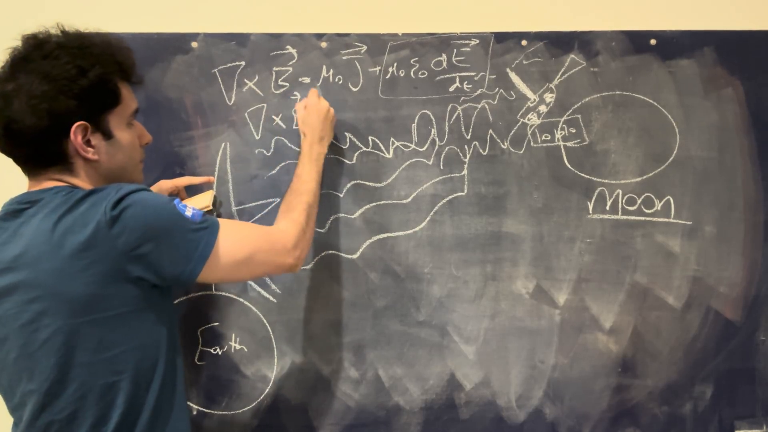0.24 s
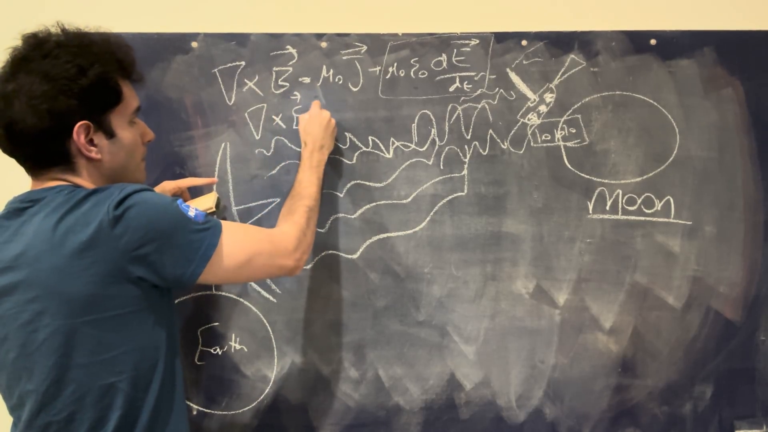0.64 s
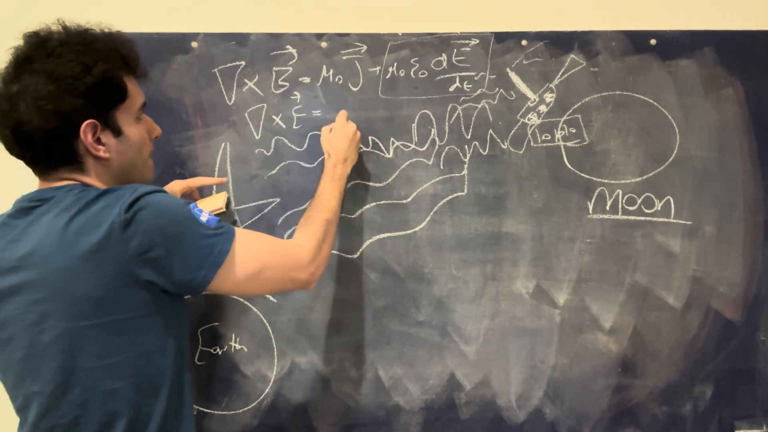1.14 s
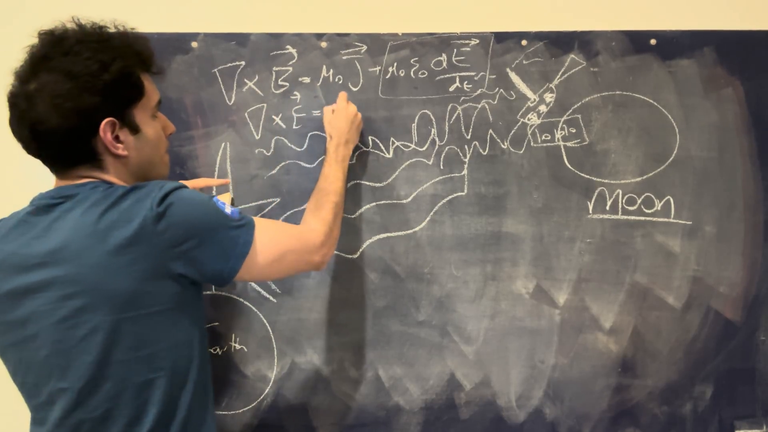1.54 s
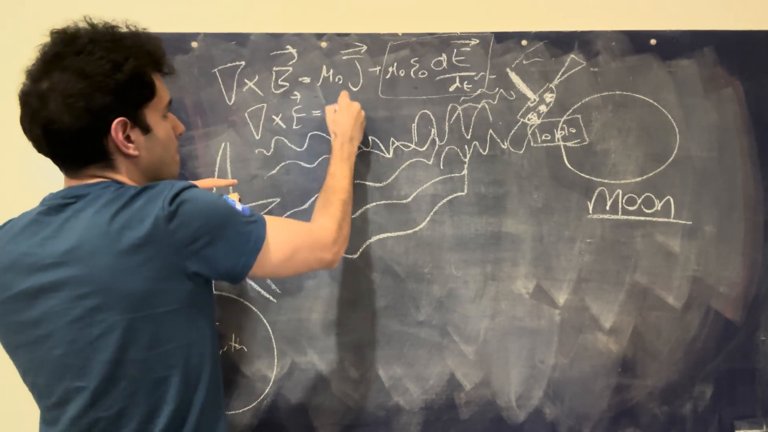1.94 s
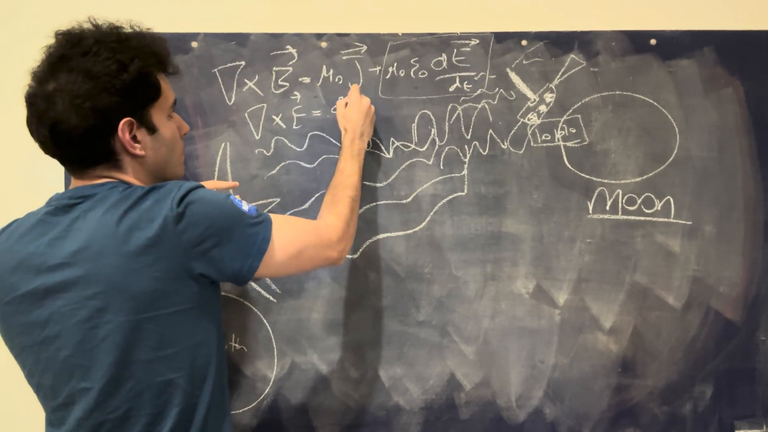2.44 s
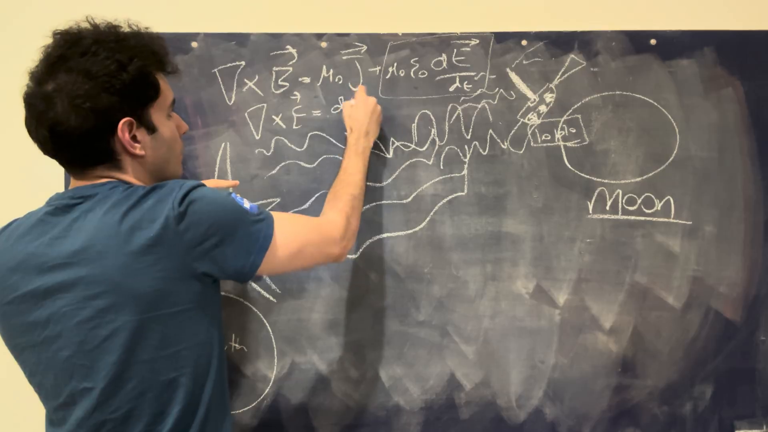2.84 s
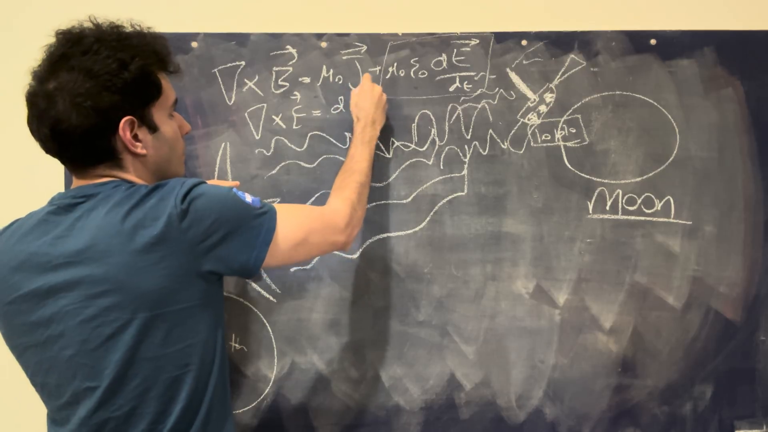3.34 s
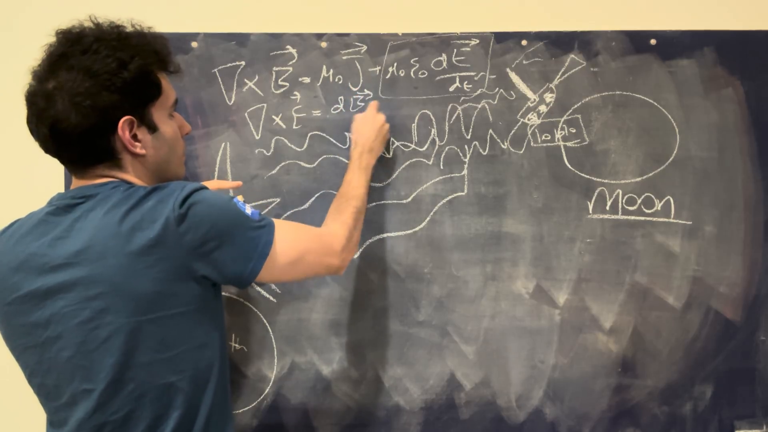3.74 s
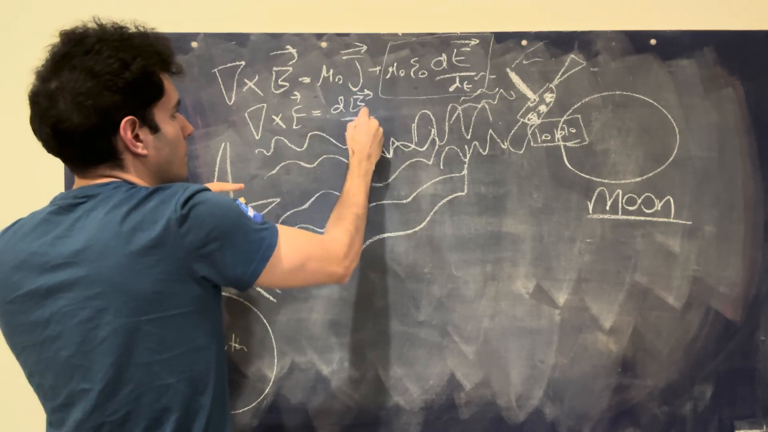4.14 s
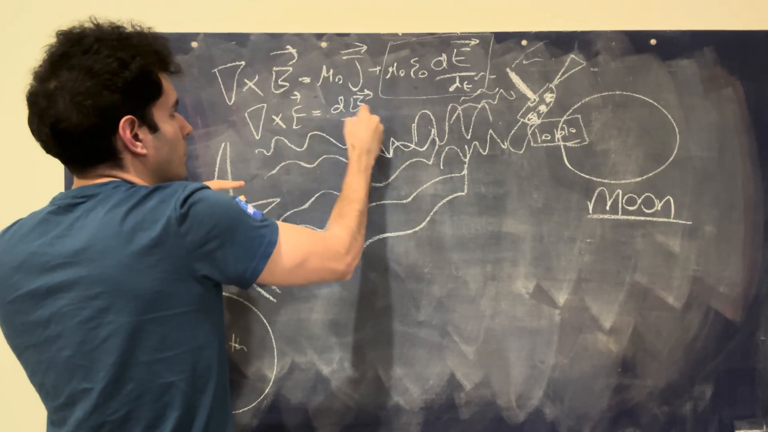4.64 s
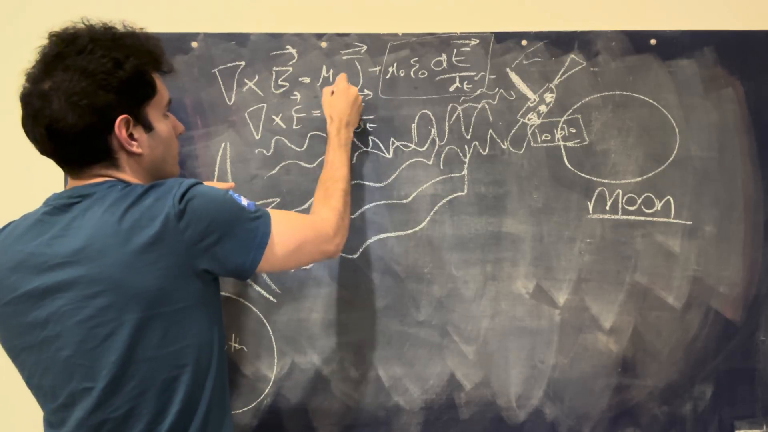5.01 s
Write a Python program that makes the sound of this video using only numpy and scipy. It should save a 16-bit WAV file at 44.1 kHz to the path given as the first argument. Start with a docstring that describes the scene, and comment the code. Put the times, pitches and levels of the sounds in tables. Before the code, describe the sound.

Short chalk strokes heard by a single microphone in a hard-walled room: each landing gives a crisp tick and a hollow, woody knock from the panel, usually followed by a quick, dry, gritty scrape. The rhythm is irregular, with gaps holding only faint dry clicks. Writing grows busier in the second half and stops shortly before the end, leaving soft duct rumble, air rush and hum.

```python
"""Chalk writes a few symbols on a wall blackboard in a quiet room, heard by one microphone.
Ventilation rushes, rumbles and hums throughout: coloured noise and wavering sines. A stroke is already
under way: the tip crumbles in tiny slips that hiss and shake the panel. Faint dry clicks fall in the pauses.
From 0.45 s taps and catches tick in the chalk and knock the panel, among more strokes until 4.7 s.
Bending waves return from the frame, something close reflects dully, the walls answer, the air is left."""
import sys
import numpy as np
from scipy import signal
from scipy.fft import rfft, irfft
from scipy.io import wavfile

SR = 44100
rng = np.random.default_rng(int(sys.argv[2]) if len(sys.argv) > 2 else 0)


def log_audio(samples):
    """Write samples as a 16-bit WAV file to the path given in sys.argv[1]."""
    # one column per channel
    frames = np.atleast_2d(samples).T
    # limit to full scale, then quantise
    limited = np.clip(frames, -1, 1)
    pcm = np.round(limited * 32767).astype(np.int16)
    wavfile.write(sys.argv[1], SR, pcm)


N = 232362
TIME = np.arange(N) / SR
FREQ = np.maximum(np.arange(N // 2 + 1) * SR / N, 1e-3)

# ring of the struck chalk tip: [f/Hz, relative level/dB]
TICK_RING = [(1000, -23), (4000, -8.5), (6500, -3), (9200, 6), (12800, 5.5), (16000, -10)]


def undb(db):
    """Decibels to gain."""
    return 10 ** (np.asarray(db) / 20)


def unit(x):
    """Scale to rms 1."""
    return x / np.sqrt(np.mean(x ** 2))


def spectrum(points, hz):
    """Join (Hz, value) points on a log-frequency axis."""
    f, value = np.transpose(points)
    return np.interp(np.log(np.maximum(hz, 1)), np.log(f), value)


def colour(x, points):
    """Give a steady signal a spectrum, at rms 1."""
    return unit(irfft(rfft(x) * undb(spectrum(points, FREQ)), N))


def walk(rate):
    """Random wandering about 0: straight lines between normal draws, `rate` draws per second."""
    knots = rng.standard_normal(8192)
    return np.interp(TIME * rate, np.arange(len(knots)), knots)


def ventilation(duct_db=-45, waver_db=2, drift_rad=0.45):
    """Broad air noise, low duct noise, sines wavering in level and phase, and air swaying below hearing."""
    # rush of air: [f/Hz, relative level/dB per Hz]
    rush_spectrum = [(62, -2), (142, 1), (212, 0.5), (305, -4.5), (510, -9.5), (760, -6), (960, -12),
                     (1260, -15), (1720, -20.5), (2650, -27.5), (5000, -32), (6600, -32), (8400, -35.5),
                     (15500, -38.5)]
    # duct rumble: [f/Hz, relative level/dB per Hz]
    duct_spectrum = [(15, -3), (30, 2), (42, 8.5), (53, 3), (62, -4), (72, -11.5), (84, -8), (105, -22.5),
                     (200, -80), (800, -100)]
    # hum, at the middle of its waver: [f/Hz, level/dB]
    hum_tones = [(119.5, -59.5), (179, -84), (210.5, -72.5), (371.4, -75)]
    # slow swaying of the air: [f/Hz, relative level/dB per Hz]
    sway_spectrum = [(2, 25), (7, 26), (11, 24.5), (16, -6), (24, -23), (45, -60), (200, -120)]
    rush_db, sway_db = -61, -29.5

    rush = undb(rush_db) * colour(rng.standard_normal(N), rush_spectrum)
    rumble = undb(duct_db) * colour(rng.standard_normal(N), duct_spectrum)
    hum = np.zeros(N)
    for hz, db in hum_tones:
        level = np.sqrt(2) * undb(db + waver_db * walk(4.1))
        hum += level * np.sin(2 * np.pi * hz * TIME + drift_rad * walk(8.5))
    sway = undb(sway_db) * colour(rng.standard_normal(N), sway_spectrum)
    return rush + rumble + hum + sway


def blow(points, size=4096):
    """The minimum-phase ring, prompt and causal, that has this spectrum, with energy 1."""
    cepstrum = irfft(np.log(undb(spectrum(points, np.arange(size // 2 + 1) * SR / size))))
    # fold the cepstrum forward in time
    cepstrum[1:size // 2] *= 2
    cepstrum[size // 2 + 1:] = 0
    ring = irfft(np.exp(rfft(cepstrum)))
    return ring / np.sqrt(np.sum(ring ** 2))


def scatter(sound, db, t60, above_hz):
    """Add a short burst of dense upper modes, drawn anew at every spot."""
    t = TIME[:len(sound)]
    burst = rng.standard_normal(len(t)) * undb(-60 * t / t60)
    burst = burst / np.sqrt(np.sum(burst ** 2))
    high_pass = signal.butter(3, above_hz, "high", fs=SR, output="sos")
    burst = signal.sosfilt(high_pass, burst)
    return sound + undb(db) * signal.fftconvolve(sound, burst)[:len(t)]


def panel(depth_db, clack_db):
    """The panel's ring, deeper or harder with the place and angle of the chalk."""
    # answer to a sharp push: [f/Hz, relative level/dB]
    push_answer = [(100, -19.5), (250, -16.5), (420, -14), (530, -3.5), (740, 4.5), (880, -6.5),
                   (1100, -11.5), (1400, -15.5), (1650, -18.5), (2100, -24.5), (3200, -35), (4000, -43.5),
                   (6500, -42.5), (16000, -110)]
    # how this touch tilts that answer: (Hz, dB)
    touch = [(530, depth_db), (740, 0), (1000, clack_db / 4), (1350, clack_db + 0.5),
             (1650, clack_db + 1.5), (2100, clack_db / 2 - 1.0), (3500, clack_db / 4)]
    return blow([(hz, db + spectrum(touch, hz)) for hz, db in push_answer])


def add(out, s, sound):
    """Mix a sound in at time s, or at the start if s is negative."""
    i = max(int(s * SR), 0)
    out[i:i + len(sound)] += sound[:N - i]


def slips(rate, spread_db):
    """Tiny fractures of the tip at random moments: many small, a few large."""
    happens = rng.random(N) < rate / SR
    sizes = undb(spread_db * np.minimum(rng.exponential(size=N), 5))
    return unit(happens * sizes * rng.standard_normal(N))


def strokes(judder_db=2.0, judder_rate=200, uneven_db=1.56, uneven_rate=45, rasp_db=-14):
    """The tip speeds up, slows and snags; its slips hiss in the chalk and shake the panel."""
    # slides, overlapping where one line turns:
    # [start t/s, length/s, pressure as panel drive level/dB, brightness of the spot/dB]
    slides = [(-.13, 0.28, -45, 2), (0.461, 0.074, -47, 3.5), (0.661, 0.061, -43, 6.5),
              (1.633, .1, -49.5, 14), (1.721, 0.18, -51, 0), (1.908, 0.14, -48, 3), (2.653, 0.093, -46, 4),
              (2.748, 0.11, -45.5, -6), (2.86, 0.061, -52.5, 2), (2.916, 0.085, -55.5, 0),
              (3.021, 0.079, -52, 11), (3.227, 0.094, -58, 3), (3.408, 0.095, -52, 7),
              (3.5, 0.065, -54, -2), (3.774, 0.13, -40.5, 12.5), (4.015, 0.084, -58, -5),
              (4.097, 0.13, -47.5, -10), (4.227, 0.11, -60, 13), (4.415, 0.14, -55.5, -5),
              (4.603, 0.084, -50, 6)]
    # ring of the rubbed chalk tip: [f/Hz, relative level/dB]
    hiss_ring = [(1000, -39), (3000, -7.5), (6300, -11), (8000, -6.5), (9500, -1.5), (12200, 2.5),
                 (14000, -3), (16000, -4)]
    # speed as a gain: fastest at this share of the length, quieter at both ends
    fastest_share, start_db, end_db, edge_s = 0.49, -9, -6, 0.01
    # hiss drive at ordinary pressure, and its growth in dB per dB of pressure
    ordinary_hiss_db, ordinary_db, hiss_per_pressure = -60, -46.5, 0.28
    # a bright spot loses depth and gains this much clack per dB
    clack_per_brightness = 0.57
    # the tip snags just before it lifts: tick over the hiss drive, and its spread between strokes
    snag_lead_s, snag_db, snag_spread_db = 0.012, 10, 0.5

    out = np.zeros(N)
    roughness_db = judder_db * walk(judder_rate) + uneven_db * walk(uneven_rate)
    grit = unit(slips(rate=14000, spread_db=2.0) * undb(roughness_db))
    for s, length_s, pressure_db, bright_db in slides:
        during = (TIME >= s) & (TIME < s + length_s)
        t = TIME[during] - s
        contact = np.clip(np.minimum(t, length_s - t) / edge_s, 0, 1)
        speed = undb(np.interp(t / length_s, [0, fastest_share, 1], [start_db, 0, end_db]))
        force = grit[during] * contact * speed

        hiss_db = ordinary_hiss_db + hiss_per_pressure * (pressure_db - ordinary_db)
        tip = scatter(blow(hiss_ring), db=-8, t60=0.015, above_hz=4000)
        add(out, s, undb(hiss_db) * signal.fftconvolve(force, tip))

        # the panel's rumble grows faster with speed than the hiss does
        spot = panel(-bright_db, clack_per_brightness * bright_db)
        shake = scatter(spot, db=rasp_db, t60=0.0083, above_hz=6600)
        add(out, s, undb(pressure_db) * signal.fftconvolve(force * speed, shake))

        tick_db = hiss_db + snag_db + snag_spread_db * rng.standard_normal()
        add(out, s + length_s - snag_lead_s, undb(tick_db) * blow(TICK_RING))
    return out


def clicks():
    """Faint dry clicks between strokes: a short ring with a burst of upper modes."""
    # clicks in the pauses: [t/s, level before the burst is added/dB]
    pause_clicks = [(0.3989, -34), (1.2984, -38), (1.377, -43), (2.399, -47), (2.453, -45), (2.4814, -42)]
    # their ring: [f/Hz, relative level/dB]
    click_ring = [(200, -22), (750, 19), (1500, 2), (3400, -3), (5500, -20), (15000, -22)]
    out = np.zeros(N)
    for s, db in pause_clicks:
        add(out, s, undb(db) * scatter(blow(click_ring), db=-3, t60=0.02, above_hz=1200))
    return out


def travel(seconds, power):
    """Phase of a bending wave that takes this long at 700 Hz; lower waves are slower, down to 110 Hz."""
    delay = seconds * (700 / np.maximum(FREQ, 110)) ** power
    return np.exp(-2j * np.pi * np.cumsum(delay) * SR / N)


def taps():
    """Each landing or catch ticks in the chalk and knocks the panel; bending waves smear the knock."""
    # the chalk lands, bounces or catches in a stroke:
    # [t/s, knock drive level/dB, extra depth/dB, extra clack/dB, extra tick/dB]
    touches = [(0.4532, -3, -1.5, 4, -5), (0.6423, 3, -1.5, 0, 2.5), (1.5937, 1, -4, -9.5, -7.5),
               (1.969, -27, -6, 4, 5), (1.981, -28.5, -7, 10, 9), (2.6295, -8, 3.5, -4.5, -10),
               (2.794, -23, 14, 10.5, -11), (3.032, -29, -21, -6, -3), (3.2122, 5, -7, -2, -4.5),
               (3.386, -6, 0, -1, -1.5), (3.5445, -13.5, -20, -2.5, 6), (3.5542, -18, -15, -15, 10),
               (3.7683, 1, -0.5, 7, -1), (4.0116, -1.5, -0.5, 0, 0.5), (4.4141, -3.5, 1.5, -3.5, -5),
               (4.5907, -6.5, 1, 0, -10)]
    tick_under_knock_db = -19.5
    knocks, ticks = np.zeros(N), np.zeros(N)
    for s, knock_db, depth_db, clack_db, tick_db in touches:
        knock = scatter(panel(depth_db, clack_db), db=3.5, t60=0.044, above_hz=1310)
        add(knocks, s, undb(knock_db) * knock)
        tick = scatter(blow(TICK_RING), db=-7, t60=0.008, above_hz=4000)
        add(ticks, s, undb(knock_db + tick_under_knock_db + tick_db) * tick)
    return irfft(rfft(knocks) * travel(0.000725, power=0.8), N) + ticks


def through(x, response):
    """Pass a sound through an impulse response."""
    return signal.fftconvolve(x, response)[:N]


def board(x):
    """Bending waves return from the frame, more of the low ones, and a few modes ring on."""
    # returns from the frame: [travel time at 700 Hz/s, power by which lower waves lag,
    # level/dB, band over which they lose a neper/Hz]
    frame_returns = [(.0102, 0.484, -1.5, 530), (0.00376, 1, 17, 114), (.0075, 1.4, 13, 232)]
    # lasting panel modes: [f/Hz, gain at resonance/dB, t60/s]
    panel_modes = [(492, 3, 0.11), (593.5, 5, 0.062), (599, -48, 0.22), (718, -23, 0.16), (759, -13.5, 1),
                   (810.3, 3.5, 0.15), (1004, 1.5, 0.63), (920, -25, 0.43), (1311, 3, 0.46),
                   (1390, -38, 0.46)]
    response = 1
    for seconds, power, db, loss_hz in frame_returns:
        response = response + undb(db) * np.exp(-FREQ / loss_hz) * travel(seconds, power)
    ring, t = irfft(response, N)[:SR], TIME[:SR]
    for hz, db, t60 in panel_modes:
        decay = np.log(1000) / t60
        mode = 2 * decay / SR * np.exp(-decay * t) * np.cos(2 * np.pi * hz * t)
        ring = ring + undb(db) * mode
    return through(x, ring)


def near_echo(x, lag_s=0.004212, db=-8, loss_hz=3500):
    """A dull reflection off something close, such as the writer's chest."""
    reflection = np.exp(-FREQ / loss_hz - 2j * np.pi * FREQ * lag_s)
    return x + undb(db) * irfft(rfft(x) * reflection, N)


def room(x, first_s=0.0028, build_s=0.012):
    """Bare walls answer with a diffuse noise tail, each band dying at its own rate."""
    # the tail's bands: [centre f/Hz, level/dB, t60/s]
    tail_bands = [(153, -3, 0.99), (395, -3, 0.5), (653, -12.5, 0.67), (930, -6, 0.53), (1580, -9.5, 0.74),
                  (3300, -2.5, 0.51), (5760, -11.5, 0.98), (10400, -20, 0.29), (15800, -13, 0.46)]
    t, noise, tail = TIME[:SR], rfft(rng.standard_normal(N)), 0
    for k, (hz, db, t60) in enumerate(tail_bands):
        # neighbouring bands crossfade
        share = spectrum([(row[0], j == k) for j, row in enumerate(tail_bands)], FREQ)
        decay = np.log(1000) / t60
        fading = np.sqrt(2 * decay / SR) * np.exp(-decay * t)
        tail = tail + undb(db) * fading * irfft(noise * share, N)[:SR]
    return through(x, tail * np.clip((t - first_s) / build_s, 0, 1))


def scene(wall_db=-5, count=3):
    """Taps send other upper modes each way; the microphone hears one way directly, all by the walls."""
    air = ventilation()
    sliding, clicking = strokes(), clicks()
    sides = [board(taps() + sliding) + clicking for _ in range(count)]
    walls = undb(wall_db) * sum(room(side) for side in sides)
    return (near_echo(sides[0]) + walls + air)[None]


def record(dry):
    """The recorder cuts the top with a steep low-pass."""
    top_hz = 15600
    low_pass = signal.ellip(10, 0.2, 70, top_hz, fs=SR, output="sos")
    return signal.sosfilt(low_pass, dry)


dry = scene()
out = record(dry)
log_audio(out)
```